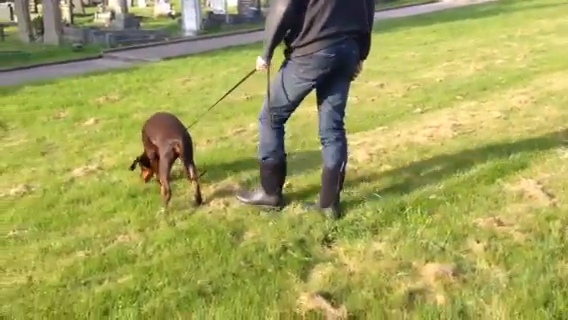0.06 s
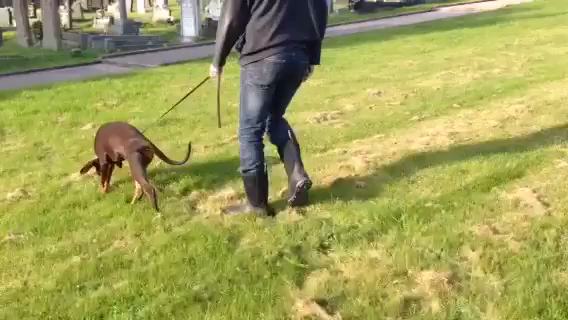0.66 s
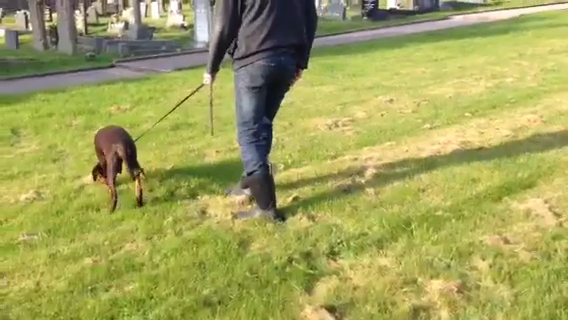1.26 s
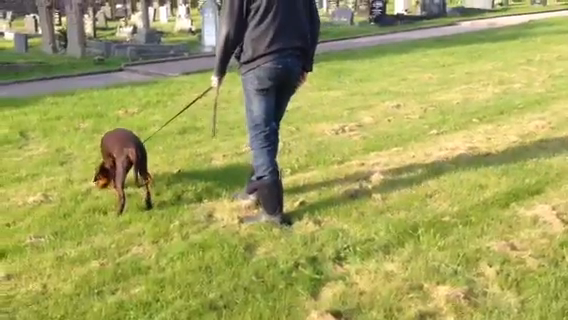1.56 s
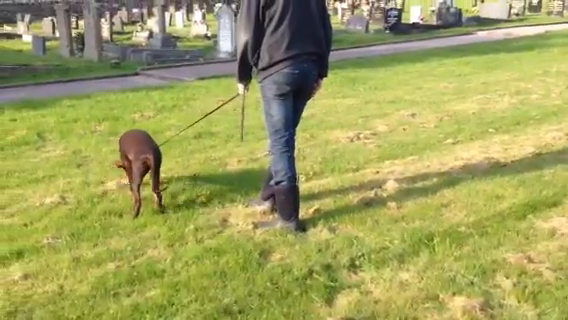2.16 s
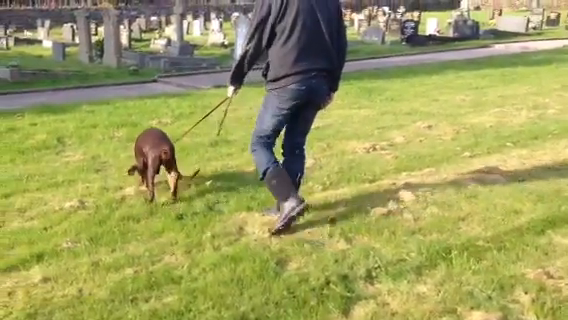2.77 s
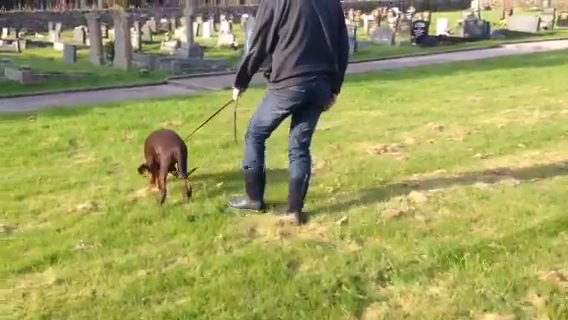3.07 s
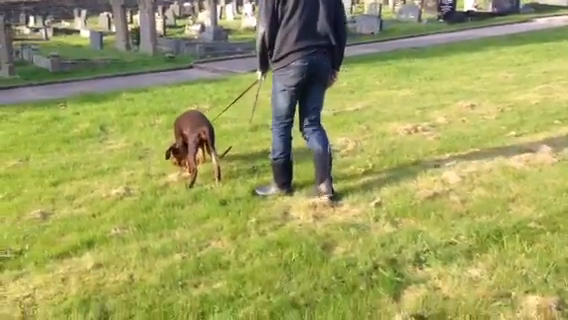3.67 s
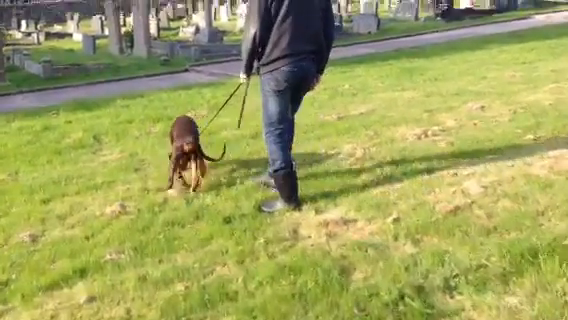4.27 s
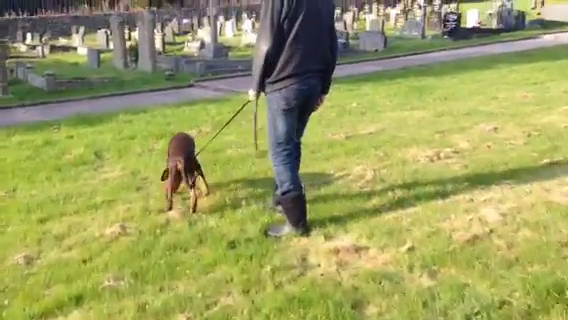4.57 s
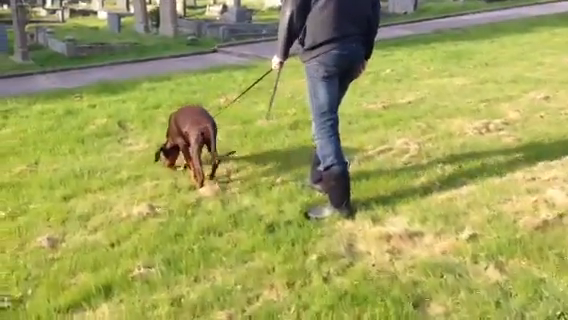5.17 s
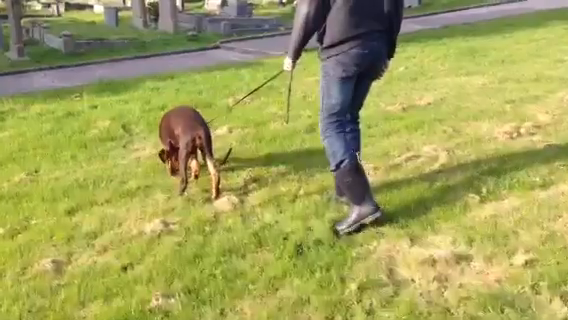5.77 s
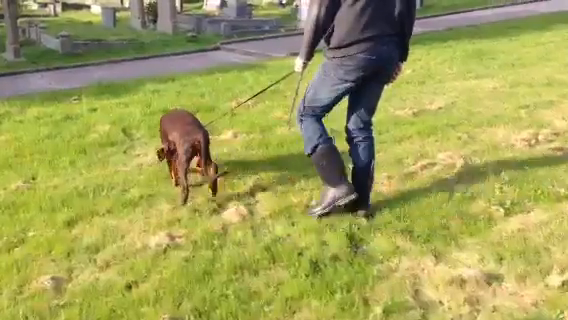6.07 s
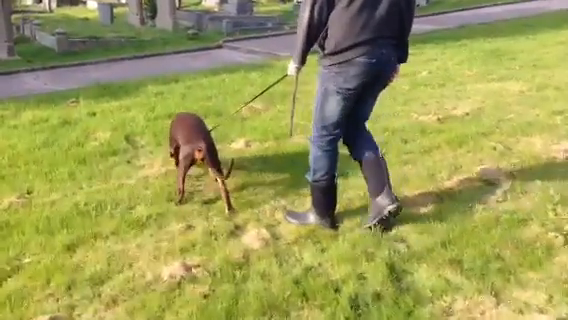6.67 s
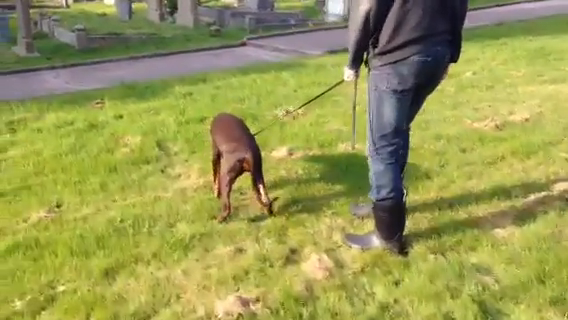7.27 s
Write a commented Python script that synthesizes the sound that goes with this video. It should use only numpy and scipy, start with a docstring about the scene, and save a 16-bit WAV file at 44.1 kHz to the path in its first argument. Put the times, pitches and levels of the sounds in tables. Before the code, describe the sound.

Three crisp double clicks from a small hand-held clicker stand out, close to the microphone and evenly spaced, each leaving a slight outdoor echo. Low puffs of wind buffet the microphone at the start and mostly die away after the middle. The background is very quiet: soft swishes of boots and paws on grass, a steady hiss and far-off traffic.

```python
"""Light wind thumps on the microphone on an open lawn; then, close by, a dog-training clicker is
pressed and let go three times. Its steel tongue buckles and sets a small plastic box ringing,
and faint echoes come back from stones and trees. Boots and paws brush through the grass,
and distant traffic hums under an even hiss."""
import sys
import numpy as np
from scipy import signal
from scipy.io import wavfile
from scipy.ndimage import map_coordinates

SR = 44100
rng = np.random.default_rng(int(sys.argv[2]) if len(sys.argv) > 2 else 0)


def inscribe(sig):
    """Save sig as 16-bit PCM at rate SR to the path in sys.argv[1].

    A 1-D sig is mono; a 2-D sig holds one channel per row.
    Samples are clipped to [-1, 1] before scaling.
    """
    pcm = np.round(np.clip(np.atleast_2d(sig).T, -1, 1) * 32767)
    wavfile.write(sys.argv[1], SR, pcm.astype(np.int16))


N = 331970
TIME = np.arange(N) / SR


def clicker():
    """Snap-through buckling: the tongue snaps down, then springs back more softly, with other modes."""
    # modes of the box, tongue bent and tongue free: (f/Hz, relative level/dB, t60/s)
    bent_modes = [(1810, -10.5, 0.0021), (2630, -18, .0095), (3200, -24.5, .014), (3550, 0.5, 0.0097),
                  (3937, -11.5, .0117), (4940, -36.5, .0072), (6900, -19.5, .0075), (10100, -24, 0.0071),
                  (13480, -40, .0039)]
    free_modes = [(1720, -24, 0.0047), (2400, -36, 0.027), (3300, -12, 0.0076), (3754, -11, 0.011),
                  (4930, -38, 0.02), (5350, -24.5, 0.0077), (7900, -35.5, 0.0046), (10810, -13, 0.0022),
                  (11050, -12.5, 0.0014), (12650, -38, 0.002)]
    # snaps down and back: (t/s, level/dB, pitch factor, ring-time factor)
    presses = [(1.4971, -5.0, 0.99, 0.76), (3.5212, -4, 1.012, 0.89), (5.6529, -4.5, 0.995, 1.08)]
    releases = [(1.6423, -5, 0.98, 0.95), (3.6533, -1.4, 0.97, 0.65), (5.773, -2, 0.978, 0.82)]
    # faint ticks of plastic and lead: (t/s, level/dB)
    faint_ticks = [(4, -50.5), (5.062, -45.5), (5.6295, -40.5)]
    press = clicks(presses, bent_modes, crack_db=-31)
    release = clicks(releases, free_modes, crack_db=-30)
    ticks = clicks([(s, db, 1, 1) for s, db in faint_ticks], free_modes, crack_db=-19)
    return press, release, ticks


def clicks(events, modes, crack_db):
    """Superposition: one snap for each event, summed on one track."""
    out = np.zeros(N)
    for s, db, pitch, ring in events:
        add(out, from_db(db) * snap(modes, pitch, ring, crack_db), s)
    return out


def snap(modes, pitch, ring, crack_db, crack_t60_s=.02, box_hz=1200, steel_hz=11500):
    """Impulse excitation: one blow starts all the damped modes, with a short crackle of steel."""
    t = TIME[:SR // 20]
    tone = 0
    for k, (hz, db, t60) in enumerate(modes):
        decay = from_db(db - 60 * t / (t60 * ring))
        tone += (-1) ** k * decay * np.sin(2 * np.pi * hz * pitch * t)
    crack = from_db(crack_db) * 1e-3 ** (t / crack_t60_s) * rng.standard_normal(len(t))
    # so small a box radiates no bass
    return butter(tone + butter(crack, steel_hz, "low"), box_hz, "high", order=6)


def echoes(click, face_hz=2900):
    """Reflection: holder and ground scatter the forward beam at once, stones and trees answer later."""
    # the nearest reflector comes closer as the holder walks: (t/s, echo delay/s)
    echo_delay = [(1.5, .0449), (3.52, .0422), (5.65, .0389)]
    # reflectors: (further delay/s, level/dB)
    reflectors = [(0, -22.5), (.0088, -30.5), (.0225, -35)]
    # the clicker's front sends out a broad band around the main ring, and its overtone
    evened = click - .8 * butter(click, [3400, 3920], "band", order=1)
    forward = butter(evened, [face_hz, 3950], "band")
    treble = from_db(-10) * butter(evened, face_hz, "high", order=1)
    overtone = from_db(2.5) * butter(click, [6150, 6950], "band", order=3)
    beam = forward + treble + overtone
    delay = in_time(echo_delay)
    slaps = np.zeros(N)
    for further, db in reflectors:
        slaps += from_db(db) * map_coordinates(beam, [(TIME - delay - further) * SR], order=3)
    slaps += from_db(-6) * scatter(slaps, t60=.017, start_s=.00051)  # rough surfaces smear each echo
    near = from_db(-26.5) * scatter(beam, t60=.07, start_s=.003)
    far = from_db(-25.5) * scatter(forward, t60=.65, start_s=.035)
    # a far line of trees returns a last soft wash
    add(far, from_db(-41) * scatter(forward, t60=.7, start_s=0), s=.56)
    return slaps + near + far


def scatter(x, t60, start_s):
    """Diffuse scattering: countless weak paths form a decaying impulse response of unit energy."""
    t = TIME[:SR]
    paths = rng.standard_normal(SR) * 1e-3 ** (t / t60) * (t > start_s)
    return signal.fftconvolve(x, paths / np.linalg.norm(paths))[:N]


def wind(eddies_per_s=5.7, eddy_over_breeze_db=6.5, spread_db=2.5, eddy_half_s=.011):
    """Turbulent pressure on the microphone port: a low draught, random eddies and a few hard gusts."""
    # strength of the breeze: (t/s, level/dB)
    breeze = [(0, -41), (.06, -37), (.17, -36), (.36, -71.5), (.5, -61.5), (.8, -59.5), (1.22, -67.5),
              (1.4, -79), (1.93, -73), (2.16, -41.5), (2.52, -56), (2.75, -52), (2.97, -55.5),
              (3.42, -50.5), (3.84, -54), (4.08, -74.5), (6.2, -71), (7.53, -62.5)]
    # gusts that thump: (t/s, level/dB, half length/s)
    gusts = [(0.047, -29, 0.0083), (0.104, -21, 0.0054), (0.168, -26.5, 0.0077), (0.758, -41, 0.012),
             (0.81, -36.5, 0.0054), (1.073, -31.5, 0.0074), (1.588, -37, 0.0073), (2.092, -36, 0.01),
             (2.249, -28, 0.0099), (2.437, -32.5, 0.0069), (2.622, -43, 0.0096), (2.868, -34.5, 0.0085),
             (3.27, -35, 0.019), (3.417, -31.5, 0.0035), (3.635, -40.5, 0.01), (3.845, -45.5, 0.012),
             (7.23, -46, 0.013)]
    breeze_db = in_time(breeze)
    draught = butter(rng.standard_normal(N), 115, "low", order=3)
    draught = butter(draught, 55, "high", order=3)
    out = from_db(breeze_db - 1) * rms_one(draught)
    count = int(eddies_per_s * N / SR)
    lateness, strength = rng.random((count, 2)).T
    times = (np.arange(count) + lateness) / eddies_per_s
    levels = np.interp(times, TIME, breeze_db) + eddy_over_breeze_db + spread_db * (2 * strength - 1)
    eddies = [(s, db, eddy_half_s) for s, db in zip(times, levels)]
    for s, db, half_s in list(gusts) + eddies:
        add(out, eddy(db, half_s), s - .25)
    return out


def eddy(db, half_s):
    """A pressure pulse of low noise, centred in half a second: brighter when stronger or shorter."""
    t = TIME[:SR // 2] - .25
    edge_hz = (162 + 100 * from_db(db + 32.5)) * (.011 / half_s) ** .096
    swell = np.exp(-np.abs(t / half_s) ** 1.5 / 2)
    push = rng.standard_normal(len(t))
    for ratio, order in [(.44, 1), (1.116, 3), (2.2, 4)]:  # the slope steepens with frequency
        push = butter(push, ratio * edge_hz, "low", order)
    push = butter(push * swell, 56, "high", order=3)
    push = from_db(db) * rms_one(push) * np.sqrt(np.mean(swell ** 2))
    # the buffeting sounds slightly hollow in the low middle
    return push - .55 * butter(push, [305, 385], "band", order=1)


def grass(blades_per_s=900, landing_half_s=.058, paws_db=-81):
    """Friction noise: boots and paws sweep the grass, a soft hiss with tiny ticks of single blades."""
    # a boot lifts and swings, then lands: (t/s, level/dB, half length/s, landing after/s)
    strides = [(-.09, -67, .03, 0.29), (0.773, -69.5, .045, 0.33), (2.948, -69.5, 0.09, .28),
               (4.0, -70, .035, 0.28), (6.082, -67, 0.12, 0.28), (6.87, -68, 0.084, 0.16)]
    # spectrum of the rustle: (f/Hz, relative level/dB)
    rustle_spectrum = [(700, -10.5), (2000, -4), (4200, -2.5), (7000, -0.5), (10000, -6), (15000, -4.5)]
    boots = sum(swish(s, db, half_s) + swish(s + after_s, db - .5, landing_half_s)
                for s, db, half_s, after_s in strides)
    paws = from_db(paws_db + 3 * drift(2.2))
    ticks = (rng.random(N) < blades_per_s / SR) * rng.standard_normal(N)
    blades = from_db(-7) * rms_one(butter(ticks, [2500, 9000], "band", order=1))
    hiss = banded_noise(rustle_spectrum, waver_db=1.2)
    return np.hypot(boots, paws) * (hiss + blades)


def swish(s, db, half_s):
    """Gaussian envelope of one sweep through the grass, peaking at time s."""
    return from_db(db) * np.exp(-((TIME - s) / half_s) ** 2 / 2)


def traffic(drone_hz=281, wander_hz=14, half_width_hz=60, rumble_db=-67):
    """Incoherent sources: distant engines merge into a narrow, wandering noise band over a rumble."""
    # strength of the drone: (t/s, level/dB)
    drone_level = [(0, -74.5), (1.15, -78), (1.7, -65.5), (2.5, -71.5), (3.9, -70.5), (4.3, -64.5),
                   (5.15, -71.5), (5.6, -66), (7.15, -66.5), (7.53, -74)]
    # spectrum of the rumble: (f/Hz, relative level/dB)
    rumble_spectrum = [(50, -9.5), (120, -2), (185, 2.5), (290, -3.5), (440, -5), (620, -11), (950, -12.5),
                       (1300, -22.5), (2500, -37)]
    centre_hz = drone_hz + wander_hz * drift(.8)
    carrier = np.exp(2j * np.pi * np.cumsum(centre_hz) / SR)
    white = rng.standard_normal(N) + 1j * rng.standard_normal(N)
    spread = butter(white, half_width_hz, "low", order=3)
    swell = from_db(in_time(drone_level) + 1.5 * drift(3.5))
    drone = swell * rms_one(np.real(spread * carrier))
    return drone + from_db(rumble_db) * banded_noise(rumble_spectrum, waver_db=2.5)


def air(level_db=-67.5):
    """Ambient noise floor: an even, broadband hiss."""
    # spectrum of the hiss: (f/Hz, relative level/dB)
    hiss_spectrum = [(100, -3), (1400, -2.5), (2500, -0.5), (3800, 2), (5500, 0), (9000, -2), (15000, -4)]
    return from_db(level_db) * banded_noise(hiss_spectrum, waver_db=.57)


def banded_noise(spectrum, waver_db):
    """Spectral shaping: half-octave bands of noise, each wavering on its own; unit rms."""
    hz, level_db = np.transpose(spectrum)
    edges = 35 * 2 ** np.arange(0, 9.1, .5)
    white, out = rng.standard_normal((2, N)), 0
    for k, (low, high) in enumerate(zip(edges, edges[1:])):
        band_db = np.interp(np.log(low * high) / 2, np.log(hz), level_db)
        out += from_db(band_db + waver_db * drift(6)) * butter(white[k % 2], [low, high], "band")
    return rms_one(out)


def drift(corner_hz, hop=40, settle=2000):
    """Slow random fluctuation: noise through a two-pole low-pass; unit rms."""
    pole = np.exp(-2 * np.pi * corner_hz * hop / SR)
    white = rng.standard_normal(N // hop + settle + 2)
    slow = signal.lfilter([1], [1, -2 * pole, pole ** 2], white)[settle:]
    return np.interp(np.arange(N) / hop, np.arange(len(slow)), rms_one(slow))


def from_db(db):
    """Level to amplitude ratio."""
    return 10 ** (np.asarray(db) / 20)


def rms_one(x):
    """Normalisation to unit rms."""
    return x / np.sqrt(np.mean(x ** 2) + 1e-20)


def in_time(rows):
    """Linear interpolation of (t/s, value) rows at every sample."""
    return np.interp(TIME, *np.transpose(rows))


def butter(x, edge_hz, kind, order=2):
    """Causal, maximally flat low-, high- or band-pass."""
    sections = signal.butter(order, np.clip(edge_hz, 10, .45 * SR), kind, fs=SR, output="sos")
    return signal.sosfilt(sections, x)


def add(track, sound, s):
    """Superpose a sound on a track, starting at time s."""
    start = int(round(s * SR))
    first, last = max(start, 0), min(start + len(sound), N)
    track[first:last] += sound[first - start:last - start]


def scene():
    """Superposition: the pressures of all sources add at one microphone."""
    press, release, ticks = clicker()
    # the release's echoes are fainter than the press's
    reflected = echoes(press + from_db(-6.5) * release)
    return (press + release + ticks + reflected + grass() + traffic() + air() + wind())[None]


def record(dry, cutoff_hz=15300):
    """Band limiting: an elliptic low-pass cuts the top steeply."""
    return signal.sosfilt(signal.ellip(10, .1, 70, cutoff_hz, fs=SR, output="sos"), dry)


dry = scene()
out = record(dry)
inscribe(out)
```